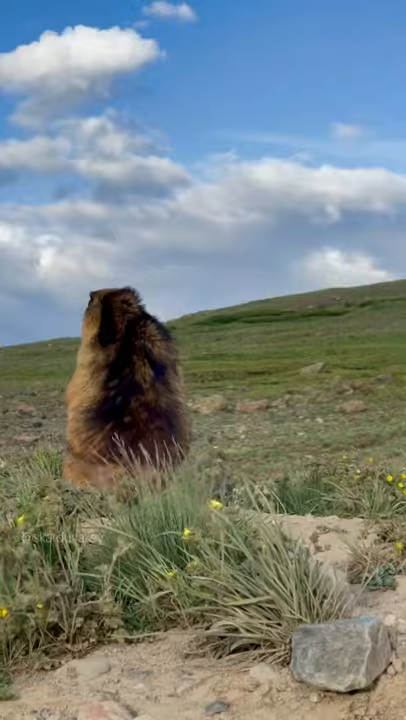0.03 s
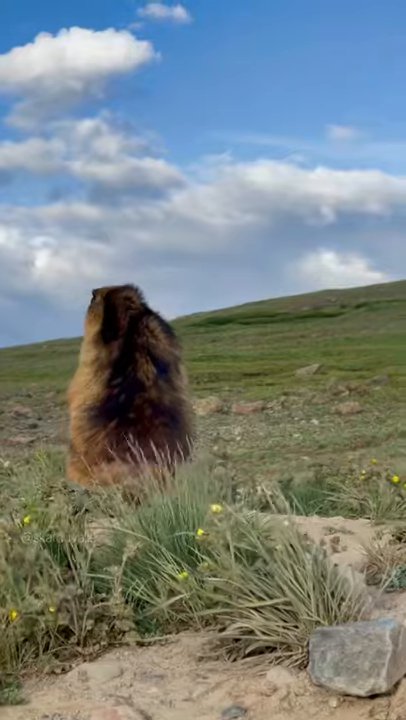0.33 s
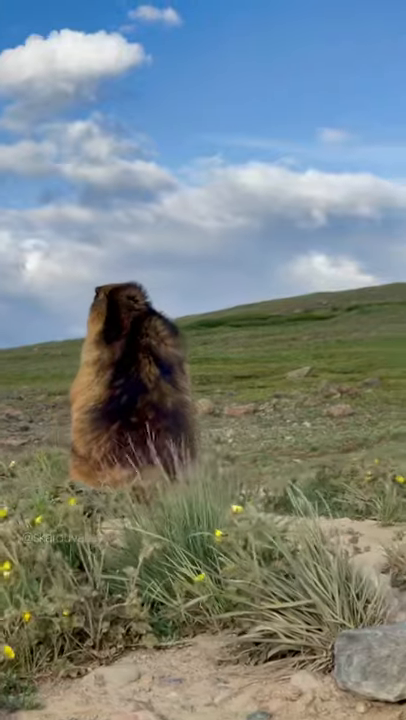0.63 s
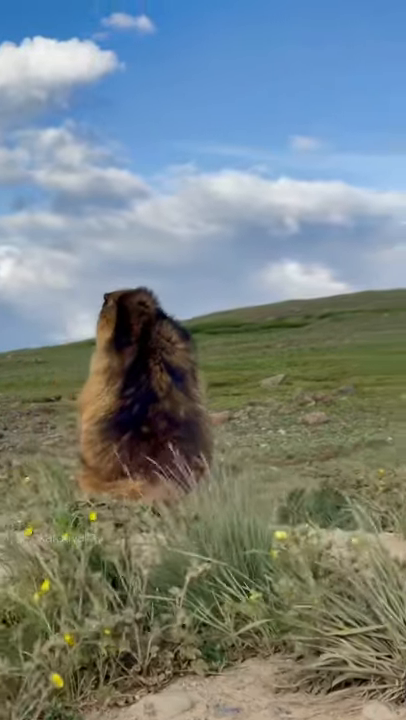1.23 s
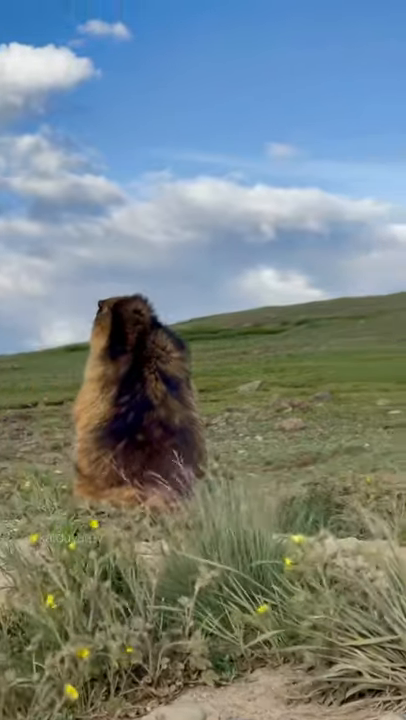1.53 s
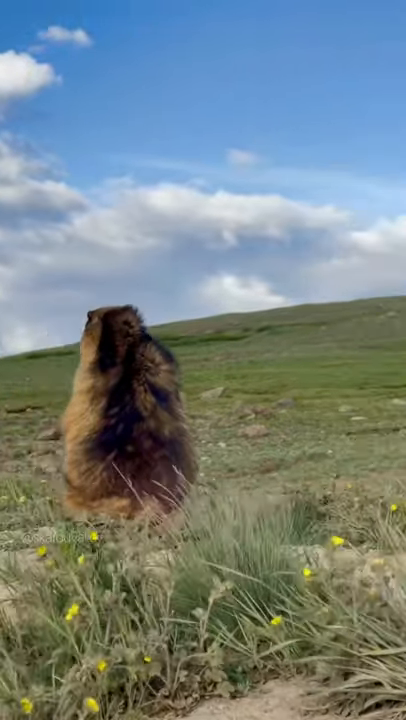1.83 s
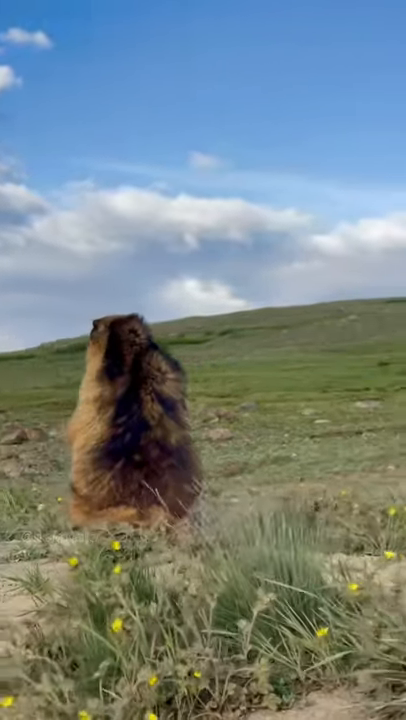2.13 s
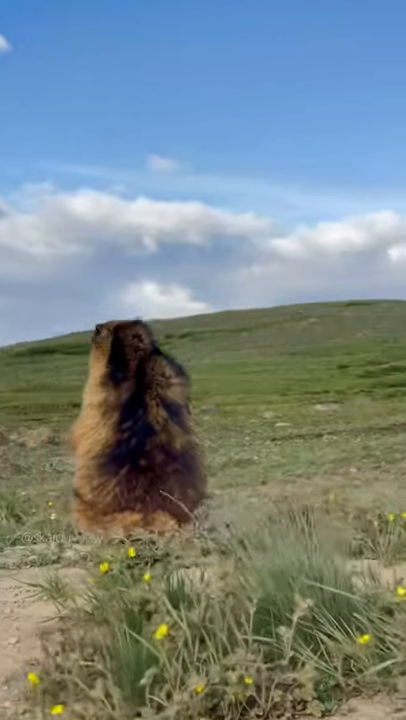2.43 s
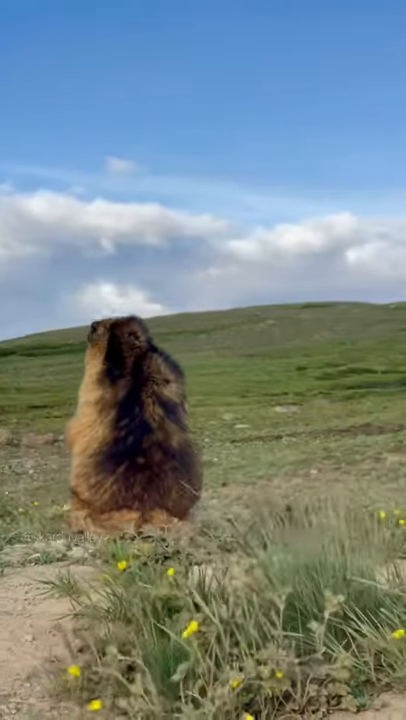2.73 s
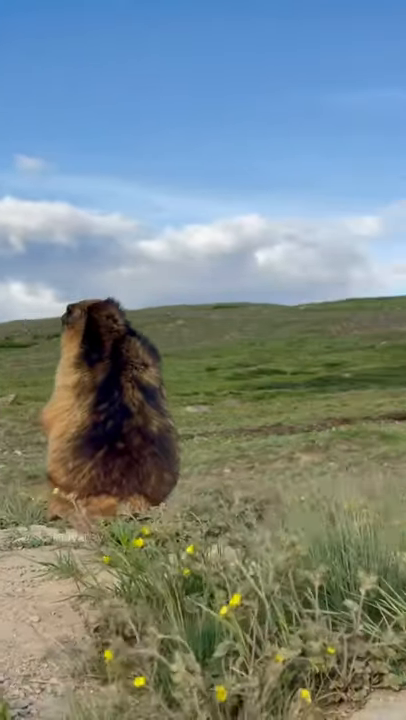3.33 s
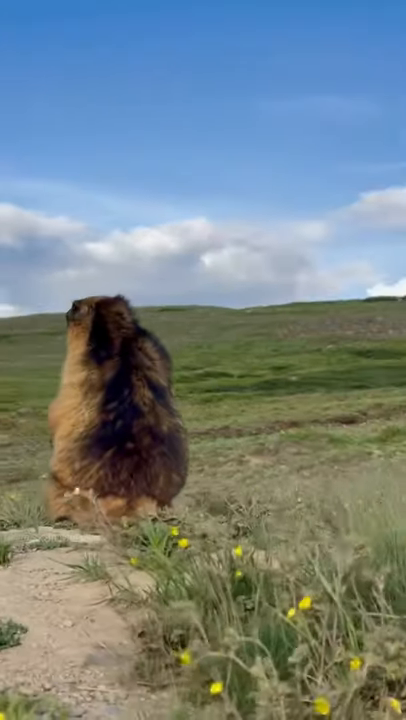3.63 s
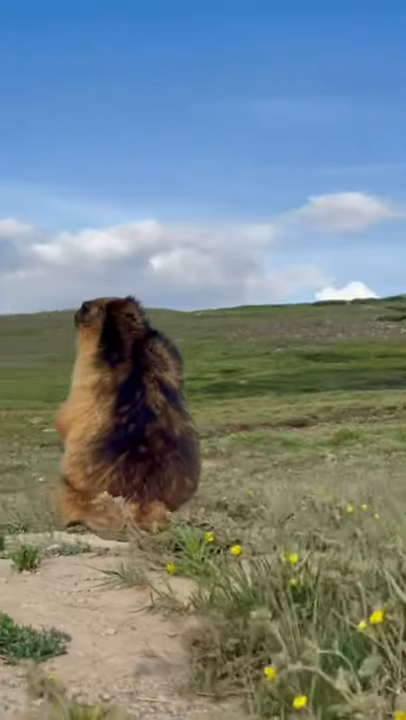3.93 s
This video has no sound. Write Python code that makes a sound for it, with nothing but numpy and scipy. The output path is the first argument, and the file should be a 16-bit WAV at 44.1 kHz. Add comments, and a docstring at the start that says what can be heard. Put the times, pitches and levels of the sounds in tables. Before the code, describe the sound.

A marmot gives two shrill alarm whistles in quick succession, each a tiny yip running into a fast trill. Wind buffets the microphone throughout and carries on alone afterwards, with grass hissing faintly on an open plain.

```python
"""Marmot whistles in the wind

A marmot on an open grassy plain gives two shrill alarm calls. Each is a short yip, then
a fast trill made by its fluttering throat. Gusts and little swirls of air buffet the
microphone with a lumpy rumble. Behind them the grass hisses and rustles, and insects buzz briefly."""
import sys
import numpy as np
from scipy import signal
from scipy.fft import rfft, irfft
from scipy.io import wavfile
from scipy.ndimage import uniform_filter1d, minimum_filter1d

SR = 44100
rng = np.random.default_rng(int(sys.argv[2]) if len(sys.argv) > 2 else 0)


def persist_wave(psi):
    """Save psi, clipped to +-1, as 16-bit WAV."""
    counts = np.round(np.clip(psi, -1, 1) * 32767).astype(np.int16)
    wavfile.write(sys.argv[1], SR, np.atleast_2d(counts).T)


N = 176400
T = np.arange(N) / SR
HZ = np.maximum(np.arange(N // 2 + 1) * SR / N, 1)

# Tone of air moving through the grass: (frequency [Hz], relative level [dB])
GRASS_COLOUR = [(100, 2), (300, -5.5), (600, -1), (900, 7), (1250, -7), (2000, -10.5), (2600, -14),
                (3300, -21), (4400, -22.5), (4900, -33.5), (5600, -21.5), (7000, -28), (8200, -32),
                (9100, -54.5), (10200, -31.5), (11500, -52.5), (14000, -83)]
# How wide that hiss spreads: (frequency [Hz], sides compared with centre [dB])
GRASS_WIDTH = [(100, -53), (470, -45.5), (780, -13), (1250, 7), (2200, -11), (3600, -6), (5000, 5.5),
               (6500, -22.5), (8000, 8), (9200, 29.5), (10500, -3.5), (14000, -1.5)]
# Gusts at the microphone: (start [s], end [s], strength [dB])
WIND_GUSTS = [(0.046, 0.07, -20), (0.073, 0.097, -9.5), (0.12, 0.393, -35.5), (0.198, 0.224, -23.5),
              (0.407, 0.468, -21.5), (0.474, 0.503, -24), (0.517, .64, -34), (0.726, 0.884, -35),
              (0.91, 0.956, -28), (0.958, 0.965, -16.5), (1.061, 1.116, -31), (1.13, 1.192, -26.5),
              (1.216, 1.3, -23.5), (1.232, 1.262, -14), (1.348, 1.349, -27.5), (1.39, 1.638, -28),
              (1.419, 1.525, -22.5), (1.69, 1.691, -13.5), (1.708, 1.734, -32.5), (1.904, 1.93, -26),
              (2.478, 2.63, -40.5), (2.622, 2.785, -32.5), (2.8, 2.865, -26.5), (2.885, 2.89, -12.5),
              (2.915, 2.926, -12.5), (2.93, 2.954, -17.5), (2.984, 2.99, -6.5), (2.997, 3.022, -18),
              (3.053, 3.107, -27.5), (3.191, 3.237, -22), (3.33, 3.46, -32), (3.471, 3.559, -29),
              (3.649, 3.722, -30.5), (3.825, 3.94, -30.5), (3.932, 4.02, -13)]
# Tone of the wind at its usual strength: (frequency [Hz], relative level [dB])
GUST_COLOUR = [(70, -10.5), (140, 3), (250, 3), (450, -1), (700, -6.5), (1000, -15.5), (1500, -26),
               (2500, -40.5), (4000, -60), (4900, -67), (7000, -64), (10000, -90.5), (16000, -110)]
# Rise and fall of the deep rumble: (time [s], relative level [dB])
RUMBLE_LEVELS = [(0.03, -26), (0.1, -17.5), (0.16, -24.5), (0.48, -22), (0.52, -31.5), (0.92, -27),
                 (0.96, -19.5), (0.99, -34.5), (1.31, -17), (1.33, -27), (1.5, -19.5), (1.9, -34),
                 (1.93, -24), (1.99, -35.5), (2.21, -27), (2.24, -39.5), (3.0, -19), (3.37, -31.5),
                 (3.44, -22), (3.65, -30), (3.71, -23), (3.78, -40.5), (3.98, -16.5), (4.0, -24.5)]
# Tone of the rumble: (frequency [Hz], relative level [dB])
DEEP_COLOUR = [(15, -42), (25, -20.5), (40, -7), (60, -1), (85, -1.5), (120, -6), (170, -14.5),
               (300, -25.5), (600, -95.5), (3000, -120)]
# Swirls of air that hit the microphone: (time [s], relative level [dB], upper edge [Hz])
SWIRLS = [(0.059, -18.5, 920), (.071, -5.5, 900), (.078, -3, 1130), (.092, -12.5, 710), (.109, -5, 1330),
          (.193, -15.5, 1100), (.286, -13, 596), (.311, -13, 500), (.403, -9, 450), (0.427, -15, 550),
          (0.445, -14, 500), (.459, -8.5, 970), (.725, -16, 1210), (.84, -12.5, 700), (.938, -17, 900),
          (.955, -14, 800), (.964, -8, 1240), (1.092, -16.5, 920), (1.13, -11, 1200), (1.174, -19, 600),
          (1.211, -12, 1420), (1.236, -9, 890), (1.254, -8.5, 1440), (1.265, -10, 1200), (1.277, -9, 1300),
          (1.289, -16, 1790), (1.296, -10, 800), (1.388, -14, 1090), (1.423, -14.5, 1180),
          (1.477, -11.5, 1960), (1.483, -9.5, 490), (1.494, -12, 1900), (1.523, -11, 890),
          (1.544, -10, 1200), (1.612, -14, 700), (1.632, -11.5, 700), (1.663, -18.5, 700),
          (1.683, -15, 706), (1.902, -20.5, 700), (2.006, -23, 606), (2.191, -24.5, 500), (2.558, -26, 500),
          (2.817, -13.5, 1050), (2.866, -10, 1400), (2.879, -9.5, 1090), (2.893, -7, 900),
          (2.924, -10, 2010), (2.929, -7, 1090), (2.972, -8.5, 1700), (2.979, -10, 1500),
          (2.986, -6.5, 1920), (2.993, -11, 2200), (3.007, -14.5, 2200), (3.021, -14.5, 1600),
          (3.229, -5.5, 1540), (3.393, -9, 950), (3.398, -14.5, 2120), (3.489, -15.5, 850),
          (3.517, -14, 645), (3.585, -14.5, 556), (3.696, -12, 660), (3.713, -19.5, 820),
          (3.836, -12.5, 800), (3.906, -7.5, 850), (3.942, -6, 1400), (3.956, -10.5, 1490),
          (3.977, -11.5, 2020)]
# Where a swirl's treble is cut: (frequency [multiple of its upper edge])
SWIRL_CUTS = [0.51, 0.87, 1.67]
# Air rushing through the marmot's throat, one list per call: (time [s], level [dB])
BREATHS = [
    [(.078, -60), (.082, -23.5), (.095, -43), (.125, -50), (.138, -32.5), (.17, -47), (.28, -54),
     (.308, -35), (.33, -56), (.37, -46)],
    [(.775, -65), (.78, -27.5), (.795, -33), (.815, -43), (.835, -43.5), (.855, -31.5), (.89, -50.5),
     (1.04, -68), (1.078, -30.5), (1.095, -61), (1.13, -76.5)],
]
# Tone of that breath: (frequency [Hz], relative level [dB])
BREATH_COLOUR = [(300, -65), (700, -15.5), (1300, 11.5), (2000, 9.5), (2800, 1.5), (3800, 0), (4500, 2.5),
                 (4900, -6), (6200, -5), (7400, -13), (8200, -21), (9100, -35), (10800, -18.5),
                 (14000, -53.5)]
# The voice's harmonics, at 1, 2, 3... times its pitch: (relative level [dB])
HARMONICS = [-1.1, -6, -13, -34.5, -37, -35]
# Tone of the whistle as heard through the microphone: (frequency [Hz], gain [dB])
WHISTLE_COLOUR = [(1400, -6), (1800, -6.5), (2080, 1.5), (3000, -5), (3650, 4.5), (4200, 2), (4600, -2.5),
                  (4900, -17), (5400, -2.5), (6300, -1), (6900, -17), (8200, -1.5), (9200, -33),
                  (10500, -3), (12500, -26)]
# The yip before each trill: (time [s], pitch [Hz], relative level [dB])
LEAD_YIPS = [(0.0817, 1590, -13), (0.7803, 1845, -14)]
# Trills: (middle of first note [s], note spacing [s], frequency the notes keep in step with [Hz])
TRILL_NOTES = [(.1526, .01383, 2001), (.8516, .0140, 2104)]
# Shape of each trill: (time [s], pitch at the top of a note [Hz], relative level [dB])
TRILL_SHAPES = [
    [(.146, 1690, -6), (.153, 1790, -14.5), (.166, 1980, -14), (.181, 2083, -11.5), (.225, 2050, -13.5),
     (.265, 2050, -13), (.279, 2010, -13), (.291, 1855, -15), (.305, 1520, -17), (.314, 1520, -24)],
    [(.845, 1490, -7), (.852, 1565, -19), (.865, 1937, -12), (.881, 2113, -11), (.907, 2200, -7),
     (.945, 2150, -10), (.977, 2093, -13.5), (1.033, 2088, -11.5), (1.048, 2060, -12.5), (1.062, 1880, -13),
     (1.076, 1517, -16), (1.086, 1470, -29)],
]
# Faint rustles in the grass: (time [s], relative level [dB])
GRASS_RUSTLES = [(0.528, -43.5), (0.571, -47), (.75, -41.5), (1.321, -51), (1.41, -44.5), (1.76, -51),
                 (1.814, -44), (1.89, -46), (1.986, -43.5), (2.164, -42), (2.21, -45), (2.295, -48),
                 (2.342, -42), (2.65, -47), (2.694, -40.5), (3.045, -44), (3.135, -46), (3.335, -48),
                 (3.366, -43), (3.58, -46), (3.76, -41.5), (3.801, -45), (3.845, -48)]
# Tone of a rustle: (frequency [Hz], relative level [dB])
BLADE_COLOUR = [(600, -21.5), (1300, -2), (2000, 4.5), (2550, 5), (3100, -12.5), (4000, -19), (8000, -26),
                (12000, -74)]
# Insect buzzes: (middle [s], half length [s], pitch [Hz], level [dB])
BUZZES = [(1.55, .04, 13900, -73), (1.81, .045, 14200, -71), (3.555, 0.029, 10660, -54)]


def from_db(db):
    """Turn decibels into a number to multiply by."""
    return 10 ** (np.asarray(db) / 20)


def unit_power(x):
    """Scale a sound to an average power of one."""
    return x / np.sqrt(np.mean(x ** 2) + 1e-20)


def at_hz(colour, hz):
    """Look up a level in a tone table, sliding smoothly between its rows."""
    frequencies, db = np.transpose(colour)
    return np.interp(np.log(hz), np.log(frequencies), db)


def in_time(rows):
    """Join timed rows with straight lines, giving one curve per value column."""
    times, *columns = np.transpose(rows)
    return [np.interp(T, times, column) for column in columns]


def during(rows, edge_s=0.00064):
    """One from the first row's time to the last, fading quickly to zero outside."""
    return np.clip(np.minimum(T - rows[0][0], rows[-1][0] - T) / edge_s + 1, 0, 1)


def tint(x, colour):
    """Shape a sound's bass and treble with a tone table."""
    return irfft(rfft(x) * from_db(at_hz(colour, HZ)), N)


def noise(colour):
    """Noise with the given tone and a power of one."""
    return unit_power(tint(rng.standard_normal(N), colour))


def drift(rate_hz):
    """A random wobble, mostly slower than the given rate."""
    return unit_power(irfft(rfft(rng.standard_normal(N)) / (1 + (HZ / rate_hz) ** 2), N))


def evened(x, samples):
    """Even out a noise's loudness over a sliding window."""
    return x / np.sqrt(uniform_filter1d(uniform_filter1d(x * x, samples), samples) + 1e-12)


def grass_hiss(centre_db=-41.5):
    """Air moving through the grass makes a wide, steady hiss."""
    centre = noise(GRASS_COLOUR)
    sides = tint(noise(GRASS_COLOUR), GRASS_WIDTH)
    return from_db(centre_db) * np.array([centre + sides, centre - sides])


def gust_strength(breeze_db=-45.5, rise_s=0.0073, fall_s=0.0051):
    """Wind strength in dB: each gust rises, holds and dies away on top of a steady breeze."""
    power = from_db(breeze_db) ** 2
    for start, end, db in WIND_GUSTS:
        fade = np.maximum(start - T, 0) / rise_s + np.maximum(T - end, 0) / fall_s
        power = power + (from_db(db) * np.exp(-np.minimum(fade, 20))) ** 2
    return 10 * np.log10(power)


def wind(usual_db=-24, trim_db=-0.36, brightening=0.083):
    """Air churns on the microphone: the harder it blows, the brighter and lumpier it gets."""
    flutter = 4 * np.clip(drift(rate_hz=167), -2, 2)
    force = gust_strength() - usual_db + flutter
    spectrum = rfft(evened(noise(GUST_COLOUR), samples=400))
    octaves = np.clip(np.log2(HZ / 125), 0, 5)
    out = 0
    for k in range(6):
        band = irfft(spectrum * np.maximum(1 - abs(octaves - k), 0), N)
        response = 1 + brightening * (k - 5)  # low bands follow the force less
        out += band * from_db(usual_db + trim_db + force * response)
    return signal.sosfilt(signal.butter(2, 60.4, "high", fs=SR, output="sos"), out)


def rumble(boost_db=1):
    """The deepest part of the buffeting swells and sinks."""
    return evened(noise(DEEP_COLOUR), samples=1300) * from_db(boost_db + in_time(RUMBLE_LEVELS)[0])


def swirls(puff_s=0.00167, lead_s=0.001554, raggedness=1.42, boost_db=1, port_hz=450, width_hz=695):
    """Each swirl is a sharp push in a ragged puff; the microphone's opening passes treble before bass."""
    out, t = np.zeros(N + SR), T[:2200]
    radius = np.exp(-np.pi * width_hz / SR)
    poles = [1, -2 * radius * np.cos(2 * np.pi * port_hz / SR), radius ** 2]
    delay = [poles[::-1] + poles] * 2  # holds back the lower tones without changing their level
    bass_cut = signal.butter(2, 175, "high", fs=SR, output="sos")
    for time, db, edge_hz in SWIRLS:
        push = rng.standard_normal(len(t)) * t ** 2 * np.exp(-t / puff_s)
        push *= raggedness / np.linalg.norm(push)
        push[int(2 * puff_s * SR)] += rng.choice([-1, 1])  # the sharp push, at the puff's peak
        treble_cuts = [signal.butter(2, edge_hz * share, fs=SR, output="sos") for share in SWIRL_CUTS]
        puff = signal.sosfilt(np.vstack([bass_cut, *treble_cuts, delay]), push)
        start = int((time - 2 * puff_s - lead_s) * SR)
        out[start:start + len(t)] += from_db(db + boost_db) * puff / abs(puff).max()
    return out[:N]


def breath():
    """Air rushes through the marmot's throat, loudest at the edges of each call."""
    return noise(BREATH_COLOUR) * sum(during(rows) * from_db(in_time(rows)[0]) for rows in BREATHS)


def cycles(pitch, wobble=0.0042):
    """Count the vibrations of a slightly unsteady voice as time goes by."""
    return np.cumsum(pitch * (1 + wobble * drift(rate_hz=500))) / SR


def whistle(phase, pitch, opening=1):
    """Harmonics shaped by the whistle's tone, as complex waves; the second needs a wide-open throat."""
    waves = np.array([from_db(db + at_hz(WHISTLE_COLOUR, k * pitch)) * np.exp(1j * k * phase)
                      for k, db in enumerate(HARMONICS, 1)])
    waves[1] *= opening
    return waves


def yips(rise_s=0.0012, fade_s=0.00252, fall_per_s=21.35, arch_s=0.054):
    """A very short, falling whistle leads in each call."""
    out = 0
    for time, hz, db in LEAD_YIPS:
        age = T - time
        swell = np.exp(-(age / np.where(age < 0, rise_s, fade_s)) ** 2)
        pitch = np.clip(hz * (1 - fall_per_s * age - (age / arch_s) ** 2), 800, 2600)
        voice = sum(whistle(2 * np.pi * cycles(pitch), pitch)).imag
        out += from_db(db) * swell * voice
    return out


def yip_tails(end_hz=903, fall_s=0.00624, rise_s=0.0024, fade_s=0.038, rough_hz=150, gain_db=-30):
    """After each yip the pitch sinks in a hoarse, fading squeak."""
    out = 0
    for time, hz, _ in LEAD_YIPS:
        age = np.maximum(T - time, 0)
        pitch = end_hz + (hz - end_hz) * np.exp(-age / fall_s)
        phase = 2 * np.pi * np.cumsum(pitch) / SR
        tone = drift(rough_hz) * np.sin(phase) + drift(rough_hz) * np.cos(phase)
        tone += 0.15 * drift(rough_hz) * np.sin(2 * phase)
        out += from_db(gain_db) * tone * (1 - np.exp(-age / rise_s)) * np.exp(-age / fade_s)
    return out


def open_plain(x, echo_db=-11.5, echo_s=0.07, right_lag_s=0.000038):
    """The call arrives with a faint scatter off the ground, a shade later on the right."""
    t = T[:SR // 2]
    scatter = rng.standard_normal(len(t)) * from_db(-60 * t / echo_s)
    left = x + from_db(echo_db) * signal.fftconvolve(x, scatter / np.linalg.norm(scatter))[:N]
    right = irfft(rfft(left) * np.exp(-2j * np.pi * HZ * right_lag_s), N)
    return np.array([left, right])


def throat_ring(wave, pitch, ring_s=0.0047):
    """The throat rings on briefly at the pitch of each note."""
    tuning = np.exp(2j * np.pi * np.cumsum(pitch) / SR)
    decay = np.exp(-1 / (ring_s * SR))
    return tuning * signal.lfilter([1 - decay], [1, -decay], wave / tuning + 1e-18)


def trill(first, spacing, step_hz, shape, dip=0.19, sharpness=1.54, slip_cycles=0.084, ring_share=0.48):
    """The throat flutters some seventy times a second; each opening lifts the pitch and the level."""
    top_hz, db = in_time(shape)
    middle = first + spacing * np.round((T - first) / spacing)
    position = 2 * (T - middle) / spacing  # runs from -1 to 1 across each note
    opening = np.cos(np.pi * position / 2) + 1e-9
    pitch = top_hz * (1 - dip * position ** 2)
    turns = cycles(pitch)
    # Each note's wave keeps in step with the last, apart from a small chance slip.
    slip = slip_cycles * np.interp(middle, T, drift(rate_hz=60))
    phase = 2 * np.pi * (turns - np.interp(middle, T, turns) + step_hz * middle + slip)
    waves = whistle(phase, pitch, opening) * during(shape) * from_db(db) * opening ** sharpness
    waves[0] += ring_share * (throat_ring(waves[0], top_hz) - waves[0])
    return sum(waves).imag


def rustles(half_s=0.0078, boost_db=2):
    """The grass stirs in tiny bursts of noise."""
    swells = sum(from_db(db + boost_db) * np.exp(-np.minimum(((T - time) / half_s) ** 2, 20))
                 for time, db in GRASS_RUSTLES)
    return noise(BLADE_COLOUR) * swells


def insects():
    """Each insect gives a brief, thin tone that flickers in level."""
    out = 0
    for time, half_s, hz, db in BUZZES:
        swell = np.exp(-((T - time) / half_s) ** 4)
        out += from_db(db) * swell * drift(rate_hz=37) * np.sin(2 * np.pi * hz * T)
    return out


def scene(start_s=0.033):
    """After an instant of silence, the marmot calls amid wind, grass and insects."""
    trills = sum(trill(*notes, shape) for notes, shape in zip(TRILL_NOTES, TRILL_SHAPES))
    marmot = open_plain(trills + yips() + breath() + yip_tails())
    mix = marmot + wind() + rumble() + swirls() + grass_hiss() + rustles() + insects()
    return mix * during([(start_s,), (N / SR,)])


def record(dry, ceiling=0.9, smooth_samples=300, cutoff_hz=16000):
    """A limiter turns down the strongest buffets, and the highest treble is cut."""
    gain = ceiling / np.maximum(abs(dry).max(axis=0), ceiling)
    gain = uniform_filter1d(minimum_filter1d(gain, 2 * smooth_samples), smooth_samples)
    return signal.sosfilt(signal.cheby2(12, 70, cutoff_hz, fs=SR, output="sos"), dry * gain)


dry = scene()
out = record(dry)
persist_wave(out)
```